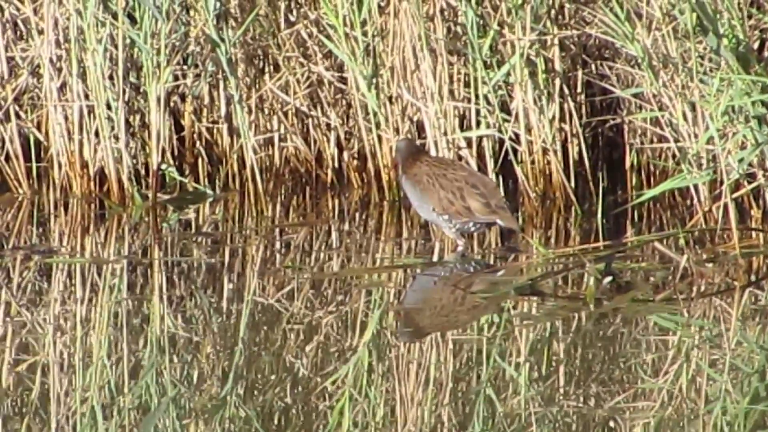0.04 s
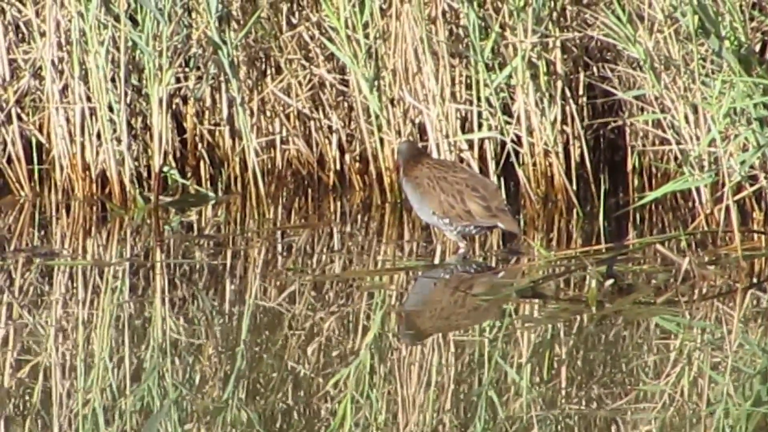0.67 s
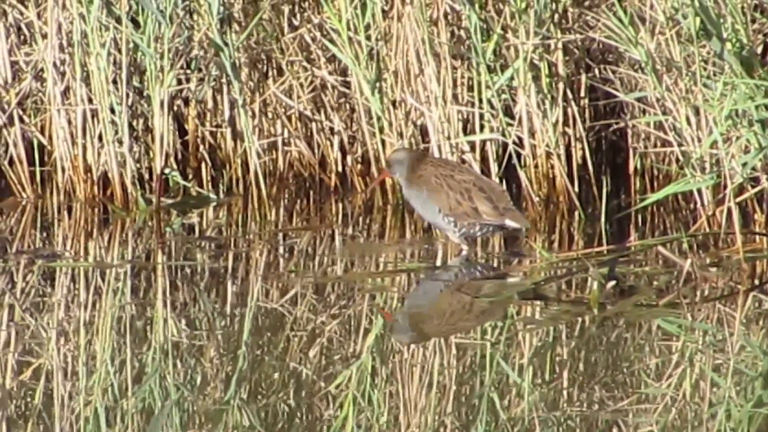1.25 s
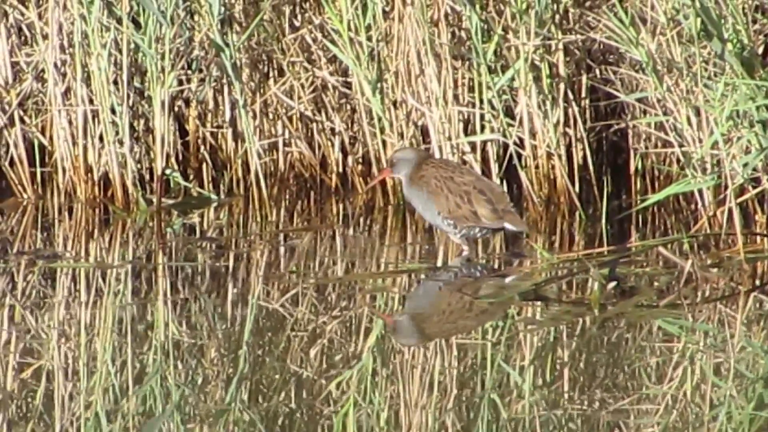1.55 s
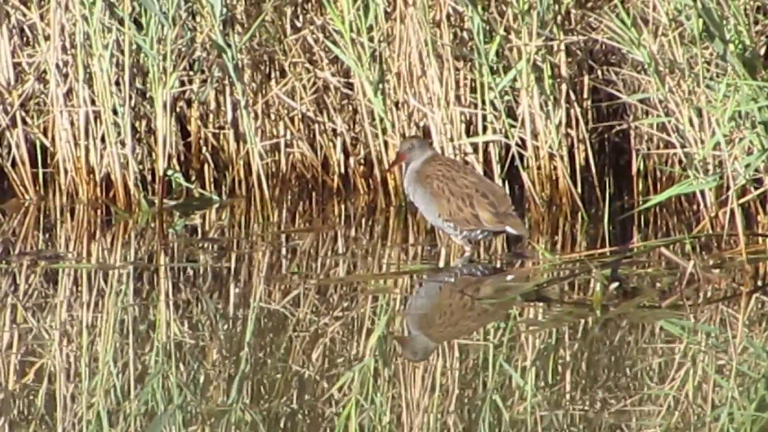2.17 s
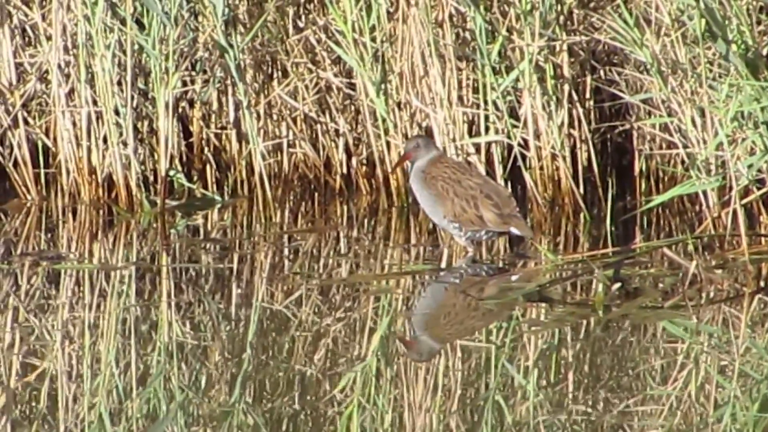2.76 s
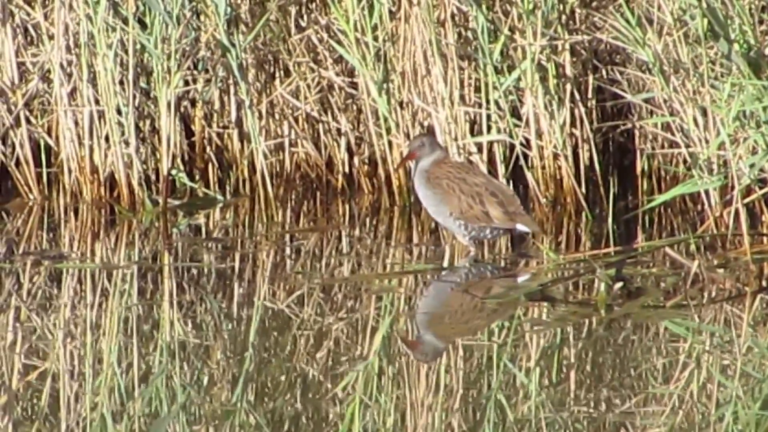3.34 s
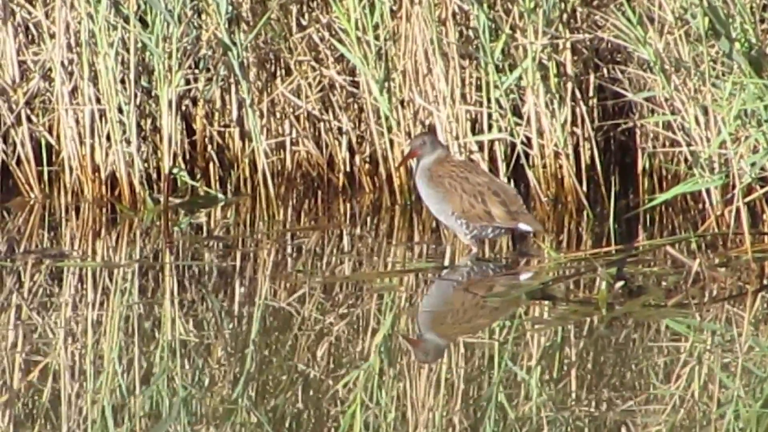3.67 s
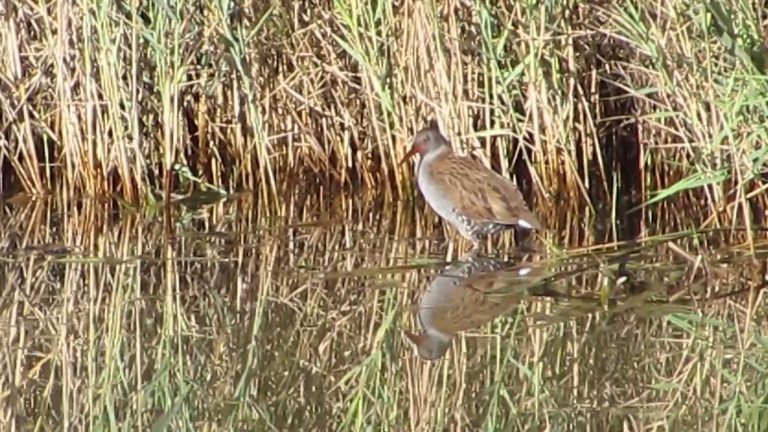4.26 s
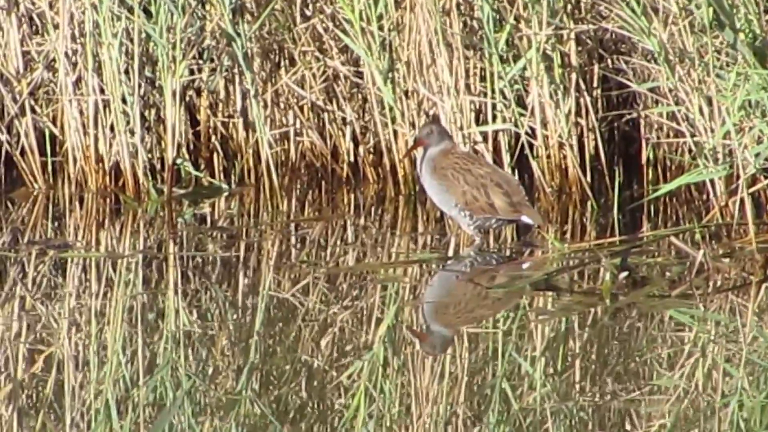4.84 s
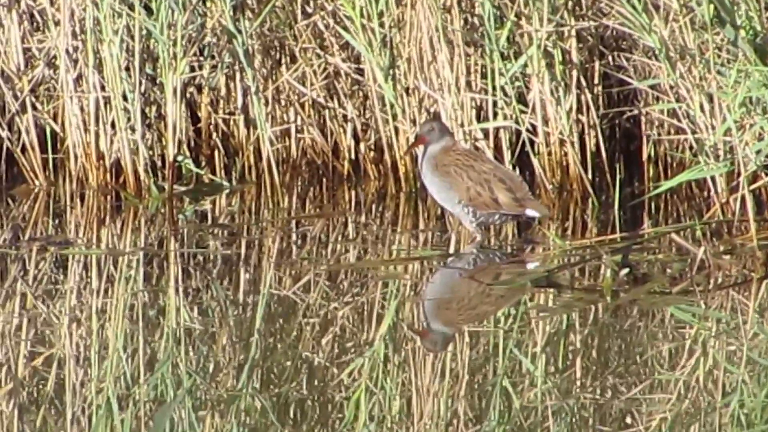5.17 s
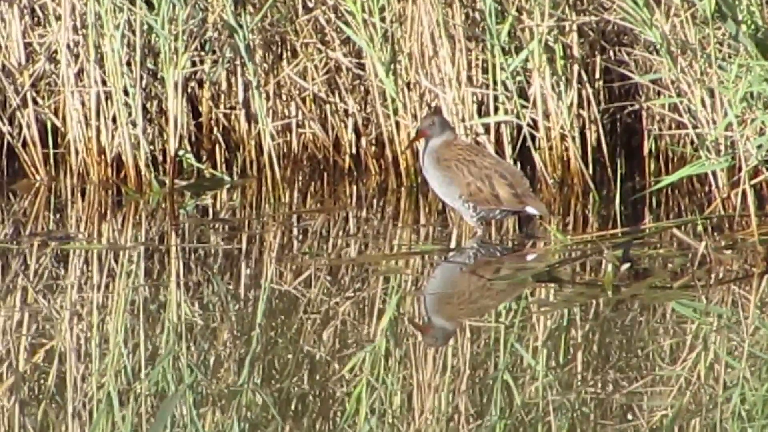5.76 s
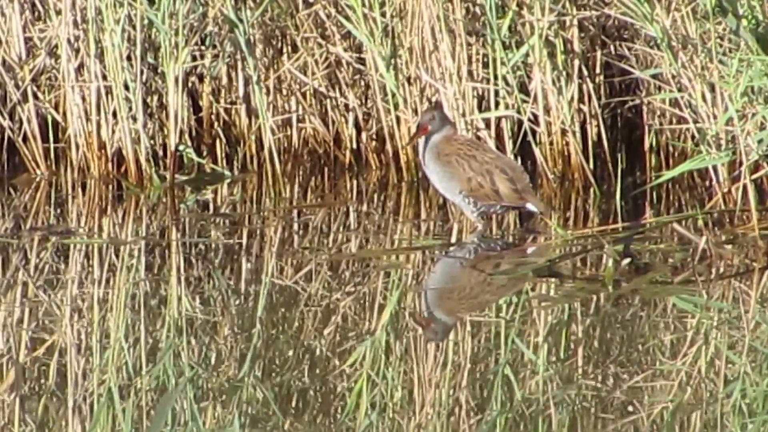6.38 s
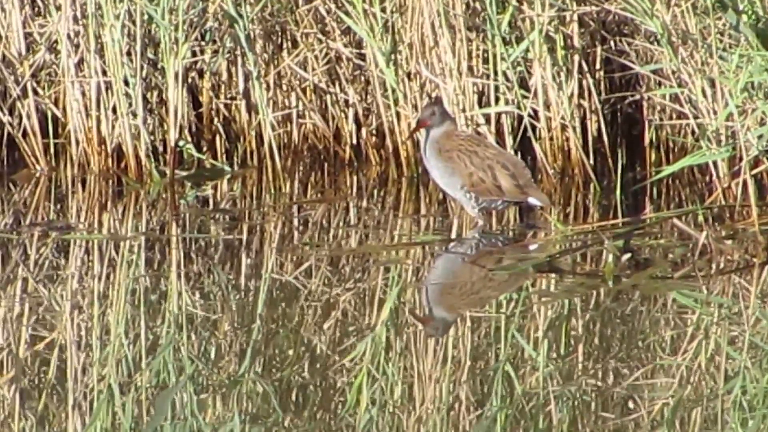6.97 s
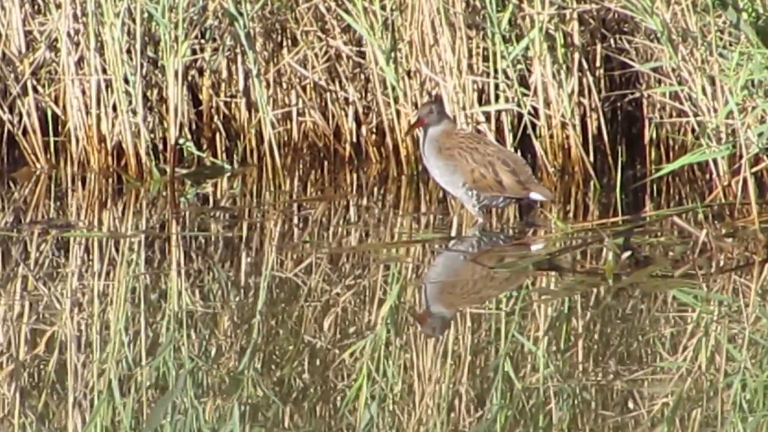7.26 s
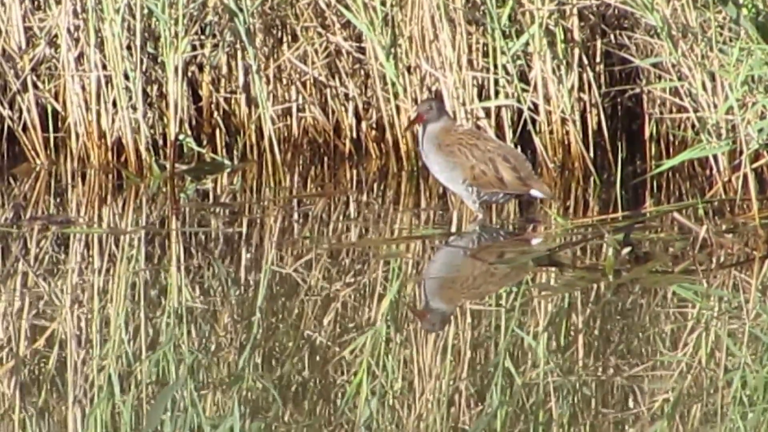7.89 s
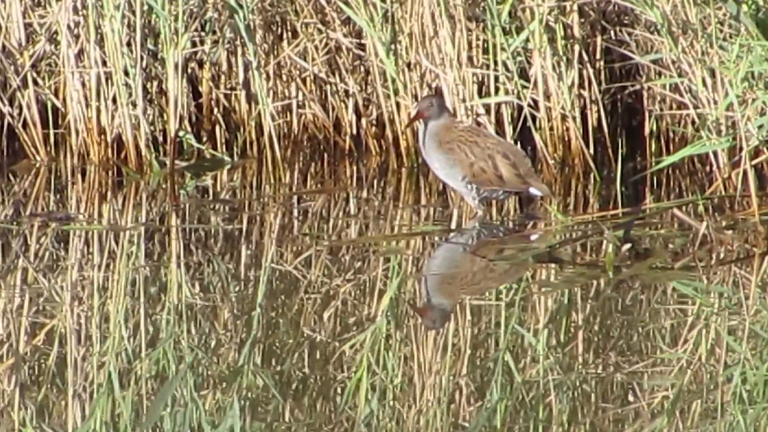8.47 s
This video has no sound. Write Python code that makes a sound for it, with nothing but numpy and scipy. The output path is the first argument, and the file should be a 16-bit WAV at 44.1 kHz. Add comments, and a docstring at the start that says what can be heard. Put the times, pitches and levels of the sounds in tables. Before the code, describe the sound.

A water bird gives short, sharp pips over distant traffic rumble and hum, with a few dull wooden bumps and a camera shutter click.

```python
"""Distant traffic rumbles behind a reedy pool, over machine drone, electric hum and microphone hiss.
One engine pulls up through a gear, its exhaust tones swelling and fading, then shifts and runs on.
Small birds squeak and whistle faintly far off. Close by come a few dull bumps on wooden boards and
the double click of a camera shutter. In front, a water bird gives six short, sharp pips, ever closer
together: each is an arched whistle that rings on in the reeds."""
import sys
import numpy as np
from scipy import signal
from scipy.fft import rfft, irfft, next_fast_len
from scipy.io import wavfile
from scipy.ndimage import map_coordinates

SR = 44100
rng = np.random.default_rng(int(sys.argv[2]) if len(sys.argv) > 2 else 0)


def transcribe(u):
    """Save the signal u as a 16-bit wav file named by the first command-line argument.

    u: samples, shape (n,) or (channels, n), limited to [-1, 1]; the rate is SR.
    q: integer samples, one column per channel.
    """
    v = np.clip(np.atleast_2d(u).T, -1, 1)
    q = np.round(v * 32767).astype(np.int16)
    wavfile.write(sys.argv[1], SR, q)


N = 384552


def amp(db):
    """Decibels to gain."""
    return 10 ** (np.asarray(db) / 20)


def unit(x):
    """Scale to rms 1."""
    return x / np.sqrt(np.mean(x ** 2) + 1e-20)


def along(points, hz):
    """Read (f/Hz, value) points on a log frequency axis."""
    freqs, values = np.transpose(points)
    return np.interp(np.log(hz + 1), np.log(freqs + 1), values)


def automation(points):
    """Join (t/s, value) points into one value per sample."""
    return np.interp(np.arange(N) / SR, *np.transpose(points))


def wobble(rate):
    """A smooth random curve with `rate` knots a second."""
    knots = rng.standard_normal(int(N * rate / SR) + 4)
    return map_coordinates(knots, [np.arange(N) * rate / SR])


def filtered(x, response):
    """Equalise x with a gain given as a function of frequency."""
    n = x.shape[-1]
    padded = next_fast_len(n + 8192)
    return irfft(rfft(x, padded) * response(np.fft.rfftfreq(padded, 1 / SR)), padded)[..., :n]


def noise(colour, correlation, size=N):
    """Stereo noise of rms 1 with a given colour and left-right correlation."""
    def mid_side_gains(hz):
        width = np.arccos(np.clip(along(correlation, hz), -1, 1)) / 2
        return colour(hz) * np.array([np.cos(width), np.sin(width)])
    mid, side = filtered(rng.standard_normal((2, size)), mid_side_gains)
    return unit(np.array([mid + side, mid - side]))


def pan(left_db):
    """Channel gains that make the left louder than the right by left_db."""
    return amp([[left_db / 2], [-left_db / 2]])


def add(track, start, sound):
    """Mix a sound in at `start` seconds."""
    part = track[..., round(start * SR):][..., :sound.shape[-1]]
    part += sound[..., :part.shape[-1]]


def scatter(x, t60):
    """Reverb thrown back by countless stems, different in each ear."""
    t = np.arange(SR) / SR
    tail = rng.standard_normal((2, SR)) * amp(-60 * t / t60) * (1 - np.exp(-t / 0.0064))
    return signal.fftconvolve(x[None], tail / np.linalg.norm(tail[0]), axes=1)


# Colour of the noise floor: f/Hz, relative level/dB
HISS_EQ = [(800, -9.5), (2500, 2), (4500, 0.5), (7500, -1.5), (8300, -4), (10000, -6.5), (10600, -4.5),
           (11400, -9), (13200, -13), (14400, -20), (15200, -34)]

def hiss():
    """The microphones' own steady hiss, unrelated left and right."""
    return amp(-54.5) * noise(lambda hz: amp(along(HISS_EQ, hz)), [(5000, 0)])


# Colours of the road's rumble and tyre roar: f/Hz, relative level/dB
RUMBLE_EQ = [(8, -43), (19, -11), (31, -15), (38, -1), (43, -6.5), (54, -2.5), (70, -4.5), (95, 0),
             (115, -6), (150, -16.5), (220, -35), (500, -70)]
ROAR_EQ = [(80, -11.5), (140, -6.5), (215, -6.5), (260, -2), (315, -2.5), (400, -5.5), (690, -8), (772, -2),
           (830, -8.5), (930, -6), (1120, -13), (1380, -12.5), (2100, -24.5), (3600, -32), (4700, -55)]
# The roar builds a little, then holds: t/s, level/dB
ROAR_FADER = [(0, -40), (4, -38.5), (6.2, -38.5), (8.72, -38.5)]
# Stereo image of the road: f/Hz, left-right correlation
ROAD_IMAGE = [(60, 1), (130, 0.59), (290, 0.19), (630, 0.44), (1390, 0.6), (3060, 0)]

def traffic():
    """A bed of low rumble and tyre roar from a far road, each swelling at random."""
    rumble_db = -38 - 1.5 * wobble(1.54)
    rumble = amp(rumble_db) * noise(lambda hz: amp(along(RUMBLE_EQ, hz)), ROAD_IMAGE)
    roar_db = automation(ROAR_FADER) + 0.66 * wobble(6)
    roar = amp(roar_db) * noise(lambda hz: amp(along(ROAR_EQ, hz)), ROAD_IMAGE)
    return rumble * pan(2.4) + roar * pan(2.54)


def machine_drone(hz=43.4, growth_db_per_s=0.44):
    """The deep, wavering note of a far machine at a fixed speed, slowly growing."""
    t = np.arange(N) / SR
    db = -41 + growth_db_per_s * (t - t.mean()) + 2.5 * wobble(3.08)
    return amp(db) * np.sin(2 * np.pi * hz * t + 0.92 * wobble(3)) * pan(2.2)


# One hum tone and two high whines: f/Hz, level/dB
HUM_TONES = [(384.6, -46.5), (7273, -85), (13125, -85)]

def electric_hum():
    """A steady electric hum with a faint, thin whine on top."""
    t = np.arange(N) / SR
    tones = sum(amp(db + 0.28 * wobble(4.03)) * np.sin(2 * np.pi * hz * t) for hz, db in HUM_TONES)
    return tones * pan(4)


# The revs climb, drop at the gear shift and run on: t/s, firing rate/Hz
ENGINE_REVS = [(0, 96.3), (1.5, 99.4), (4, 109.6), (5.4, 114.4), (6.2, 116), (6.55, 88), (8.72, 89.5)]
# Swells and fades over the distance, played relative to their mean: t/s, level/dB
ENGINE_SWELL = [(0, -40.4), (1.15, -39.5), (1.95, -32), (2.25, -35.7), (2.7, -31.5), (3.15, -31.5),
                (3.6, -42), (3.8, -31.5), (4.04, -40), (4.3, -28.5), (4.5, -45), (4.9, -30), (5.2, -46),
                (5.4, -32), (5.56, -44), (6.55, -43), (7.35, -39.5), (8.72, -37.5)]
# Exhaust tones: multiple of the engine cycle, level/dB, share of the swell followed
EXHAUST_ORDERS = [(4, -39.5, .15), (5, -34.5, 0.94), (6, -53.5, .4), (7, -51, 0.3), (9, -58, 0.56)]

def engine(firings_per_cycle=5, flutter_db=1.33):
    """Exhaust tones on multiples of the engine cycle; the firing tone swells and fades most."""
    cycle_phase = 2 * np.pi * np.cumsum(automation(ENGINE_REVS) / firings_per_cycle) / SR
    swell_db = automation(ENGINE_SWELL)
    swell_db -= swell_db.mean()
    exhaust = np.zeros(N)
    for order, db, share in EXHAUST_ORDERS:
        gain = amp(db + share * swell_db + flutter_db * wobble(8.6))
        phase = order * cycle_phase + 0.23 * wobble(4.6) + rng.uniform(0, 2 * np.pi)
        exhaust += gain * np.sin(phase)
    return exhaust * pan(2.1)


def far_note(start_hz, glide_hz_per_s, length_s, quaver):
    """A quavering, gliding note that swells and fades, heard only as reverb from the reeds."""
    t = np.arange(int(length_s * SR)) / SR
    hz = (start_hz + glide_hz_per_s * t) * (1 + quaver * wobble(199)[:len(t)])
    note = np.sin(np.pi * t / length_s) * np.sin(2 * np.pi * np.cumsum(hz) / SR)
    return scatter(note, t60=0.48)


# One far bird repeats a thin, sinking whistle: t/s, level/dB
WHISTLE_CUES = [(1.36, -65), (3.029, -62), (5.177, -63), (8.2, -62)]
# Other small birds squeak: t/s, level/dB, starting f/Hz, glide/(Hz/s)
SQUEAK_CUES = [(0.65, -52, 7420, -2500), (7.02, -54, 6200, 2500), (7.075, -57, 6700, 5000),
               (7.54, -56, 7000, 2500), (7.87, -57, 4430, -2500), (7.945, -54, 3930, -2500),
               (8.235, -55, 4040, 3000), (8.48, -56, 5250, 2004)]

def small_birds():
    """Thin whistles and short squeaks from far back in the reeds."""
    out = np.zeros((2, N))
    for start, db in WHISTLE_CUES:
        add(out, start, amp(db) * far_note(7000, -450, length_s=0.25, quaver=0.012))
    for start, db, hz, glide in SQUEAK_CUES:
        add(out, start, amp(db) * far_note(hz, glide, length_s=0.097, quaver=0.033))
    return out


# Resonances of the boards: f/Hz, bandwidth/Hz, relative level/dB
BOARD_MODES = [(103, 10.5, 17.5), (311, 40, 7), (408, 37, 4), (507, 110, 1), (640, 83, -1.5),
               (830, 120, -11), (1340, 230, -13)]

def struck_boards(hz, contact_hz):
    """Response of wooden modes of alternating sign to a contact that favours one broad band."""
    def resonance(centre, width):
        return 1j * hz * width / (centre ** 2 - hz ** 2 + 1j * hz * width)
    modes = sum((-1) ** k * amp(db) * resonance(centre, width)
                for k, (centre, width, db) in enumerate(BOARD_MODES))
    treble_cut = 1 / (1 + 1j * hz / (1.8 * contact_hz)) ** 2
    return modes * resonance(contact_hz, contact_hz) * treble_cut


# Hits on wood: t/s, crest level/dB before trim, contact f/Hz, hardness (0 scuff, 1 blow)
BUMP_CUES = [(5.811, -26.5, 700, .95), (5.838, -33.5, 700, 0.3), (5.882, -33, 1200, 0),
             (6.285, -33.5, 380, 0.3), (6.315, -29, 363, .1), (6.40, -40, 400, 0.2)]

def wood_bumps(trim_db=1.0):
    """Abrupt hard blows and slower soft scuffs shake the wooden boards."""
    out, t = np.zeros((2, N)), np.arange(SR // 2) / SR
    for start, db, contact_hz, hardness in BUMP_CUES:
        rise_s = np.interp(hardness, [0, 1], [0.013, 0.00244])
        t60 = np.interp(hardness, [0, 1], [0.2, 0.11])
        envelope = (1 - np.exp(-t / rise_s)) * amp(-60 * t / t60)
        envelope /= envelope.max()
        force = envelope * noise(np.ones_like, [(500, 0.79)], size=len(t))
        force[:, round(rise_s * SR)] += 30 * hardness  # a hard contact starts with a knock
        ring = filtered(force, lambda hz: struck_boards(hz, contact_hz))
        crest_factor = unit(envelope).max()
        add(out, start, amp(db + trim_db) * unit(ring) / crest_factor)
    return out * pan(2.5)


# Clicks of a handled camera and its shutter: t/s, level/dB, t60/s, tilt above 1 kHz/(dB/octave)
CLICK_CUES = [(1.75, -42, .08, -8), (6.494, -41, .039, -7), (6.523, -46, .08, -5), (6.584, -38.5, .04, 0.5),
              (6.597, -44, .058, 4), (6.678, -31, 0.042, -4.5), (6.694, -46, .12, 1)]
# Colour of the mechanism before tilt and low cut: f/Hz, relative level/dB
SHUTTER_EQ = [(600, -21), (1550, 10), (2100, 0), (3300, 3), (5000, -6), (6500, -3), (8000, -12),
              (10200, -1), (12000, -12), (15000, -15)]

def shutter():
    """A small mechanism snaps open and shut; nearby walls add a short tail."""
    out, t = np.zeros((2, N)), np.arange(SR // 3) / SR
    attack = 1 - np.exp(-t / 0.00066)
    wall_tail = amp(-16 - 60 * t / 0.32)
    for start, db, t60, tilt in CLICK_CUES:
        def colour(hz):
            octaves = np.log2(np.maximum(hz, 1000) / 1000)
            low_cut = hz / (hz + 500)
            return amp(along(SHUTTER_EQ, hz) + tilt * octaves) * low_cut
        envelope = attack * (amp(-60 * t / t60) + wall_tail)
        add(out, start, amp(db) * envelope * noise(colour, [(5000, -0.1)], size=len(t)))
    return out * pan(3.1)


# The water bird's calls: t/s, level/dB before trim, top f/Hz
PIP_CUES = [(1.101, -37.5, 3070), (3.439, -36.5, 3030), (5.361, -38, 3052), (6.657, -36, 3080),
            (7.415, -36, 3076), (7.956, -35.5, 3065)]
# Timbre of an average pip: harmonic number, relative level/dB
PIP_HARMONICS = [(1, -0.5), (2, -21.5), (3, -30), (4, -30)]

def water_bird(crest_s=0.0107, flick_s=0.0262, pitch_drop=0.28, trim_db=0.5):
    """Each pip is a short arched whistle that flicks down as it fades and rings in the reeds."""
    attack_s, hold_s, release_s, sag_db_per_s = 0.003, 0.022, 0.005, 170
    out, t = np.zeros((2, N)), np.arange(SR // 20) / SR
    arch = 1 - pitch_drop * (1 - np.exp(-((t - crest_s) / flick_s) ** 2))
    release = np.exp(-np.maximum(t - hold_s, 0) / release_s)
    envelope = (1 - np.exp(-t / attack_s)) * amp(-sag_db_per_s * t) * release
    mean_db = np.mean([db for _, db, _ in PIP_CUES])
    for start, db, top_hz in PIP_CUES:
        phase = 2 * np.pi * np.cumsum(top_hz * arch) / SR
        overtone_db = 1.4 * (db - mean_db)  # louder is brighter
        tone = sum(amp(level + overtone_db * (k > 1)) * np.sin(k * phase) for k, level in PIP_HARMONICS)
        pip = amp(db + trim_db) * envelope * tone
        add(out, start, pip)
        add(out, start + 0.008, amp(-6.5) * scatter(pip, t60=0.23))  # near reeds
        add(out, start + 0.03, amp(-11) * scatter(pip, t60=1.2))  # banks
    return out


def scene():
    """The full mix at the water's edge."""
    bed = traffic() + engine() + machine_drone() + electric_hum()
    return bed + water_bird() + small_birds() + wood_bumps() + shutter() + hiss()


def record(dry, top_hz=15200):
    """The camera cuts two narrow notches in the treble and has a steep band limit."""
    def notch(hz, centre, width):
        return np.abs(hz - centre) / np.hypot(hz - centre, width)
    return filtered(dry, lambda hz: notch(hz, 3974, 150) * notch(hz, 7950, 98) * (hz < top_hz))


dry = scene()
out = record(dry)
transcribe(out)
```